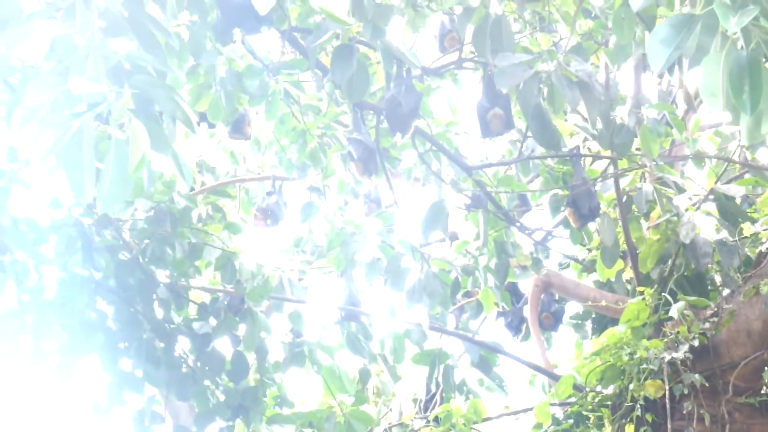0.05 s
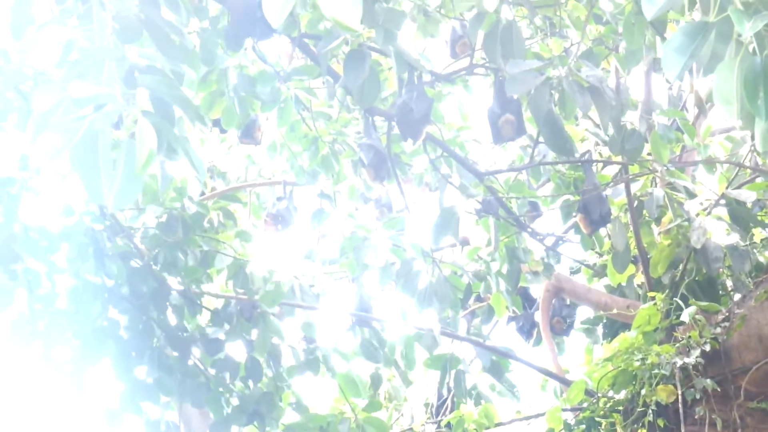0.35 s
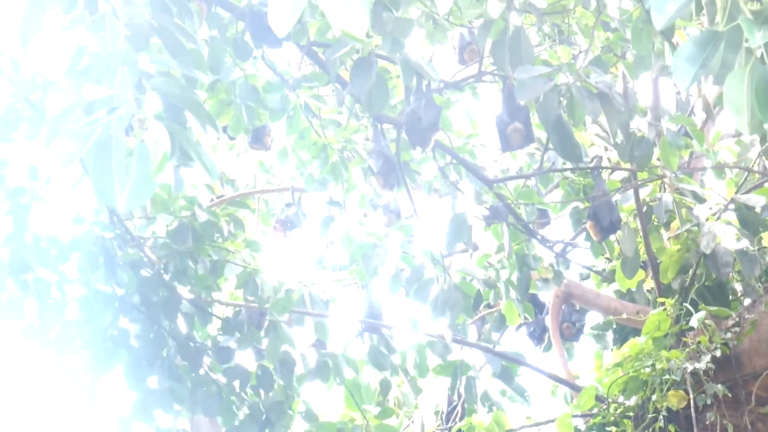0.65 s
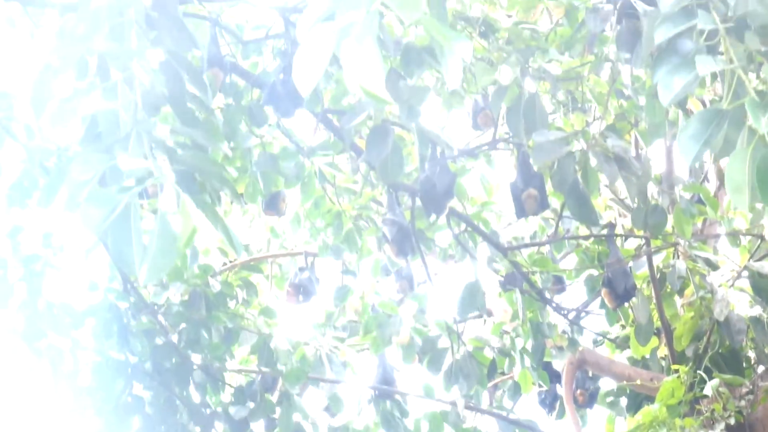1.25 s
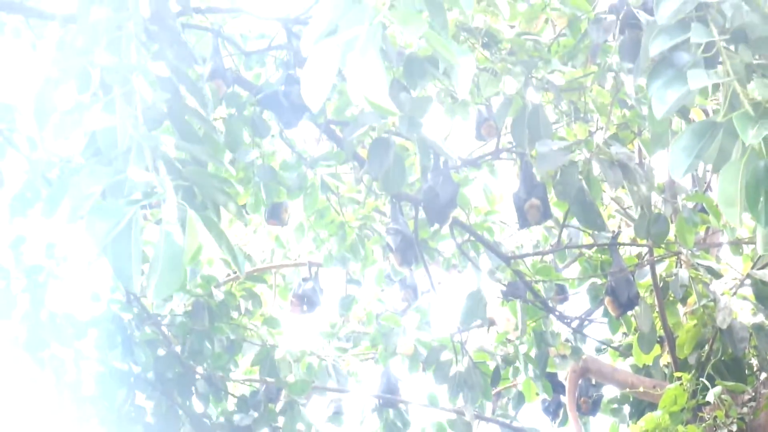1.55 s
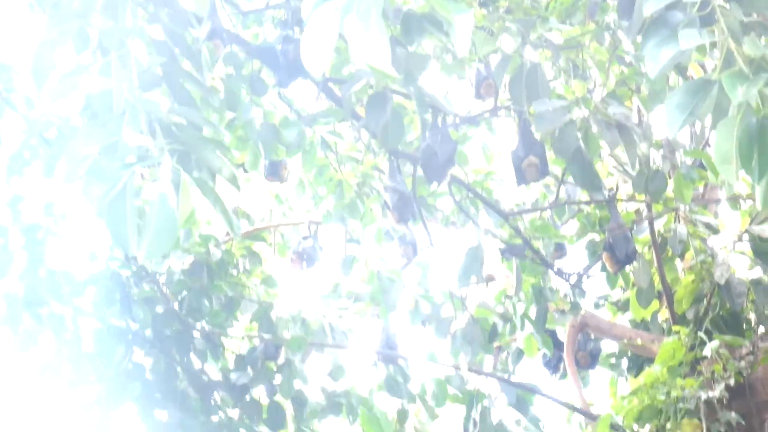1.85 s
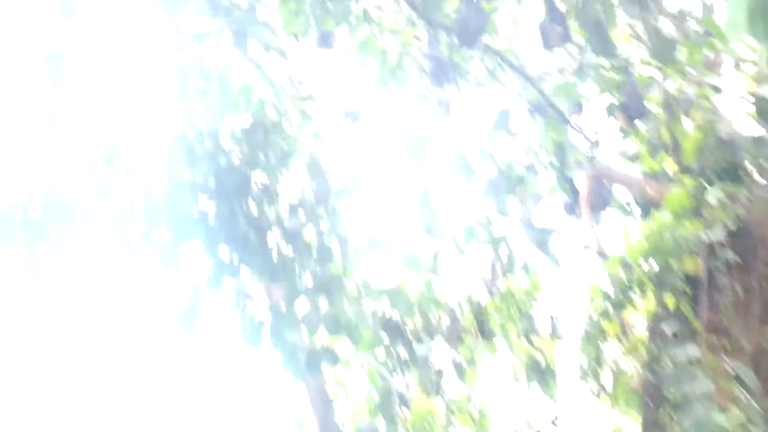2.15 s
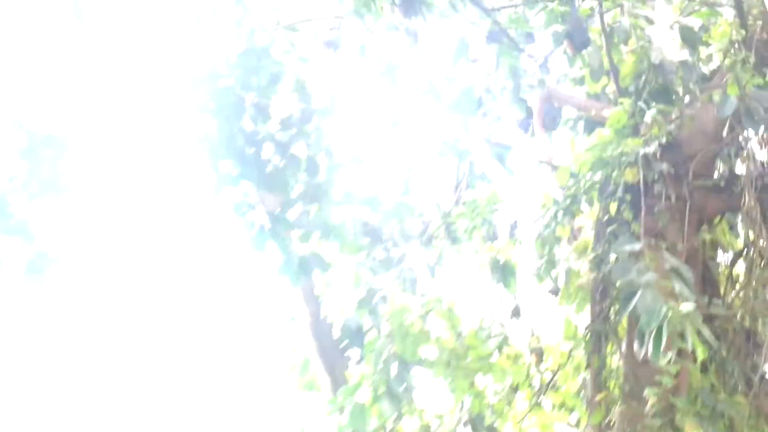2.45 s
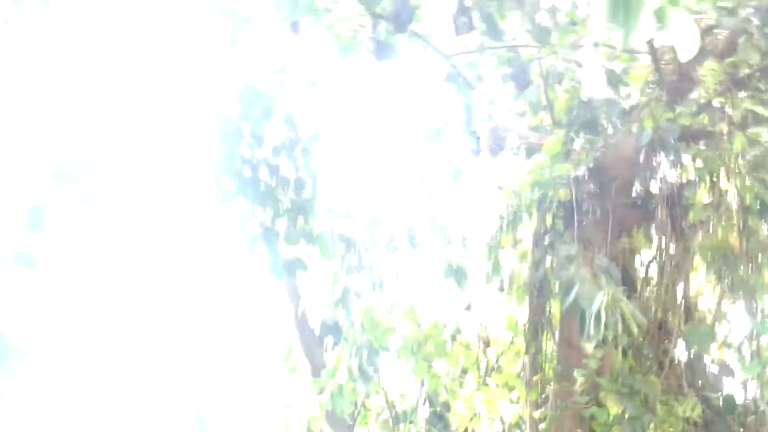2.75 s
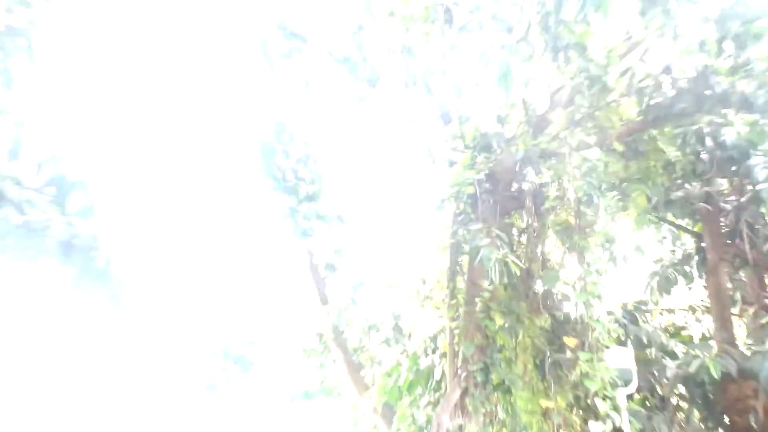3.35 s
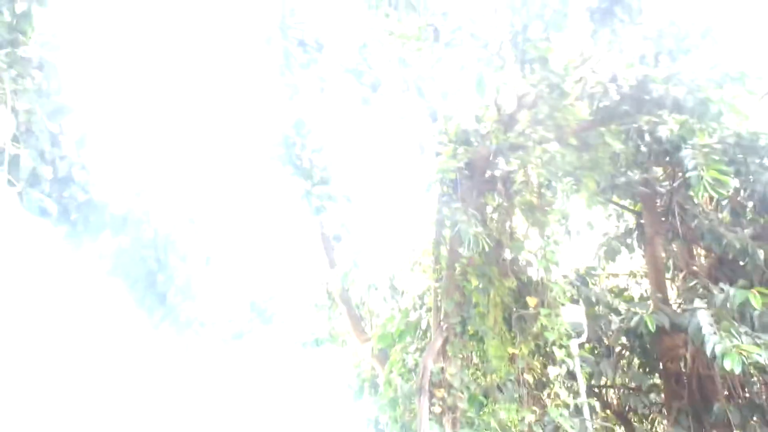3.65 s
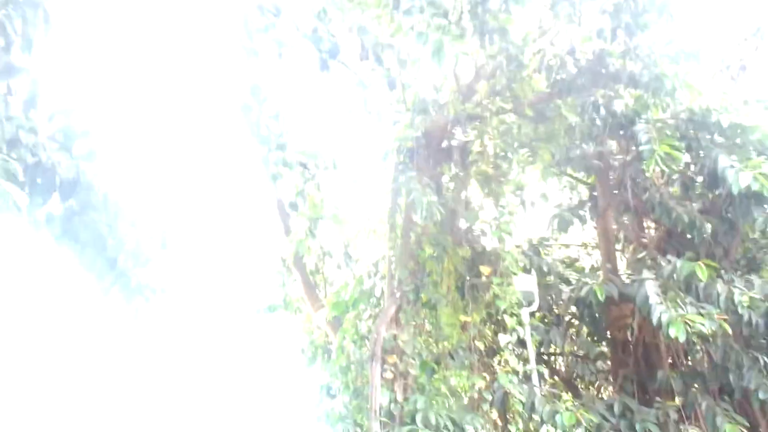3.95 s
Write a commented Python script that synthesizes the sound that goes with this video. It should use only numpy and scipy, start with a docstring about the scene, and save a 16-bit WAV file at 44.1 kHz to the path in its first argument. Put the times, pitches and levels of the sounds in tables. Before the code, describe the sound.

A colony of fruit bats screeches and squeaks without pause in tall trees. A whistling call opens, then nearer squeals, raspy screeches and thin high chirps stand out from the crowd. Traffic rumbles faintly far away.

```python
"""Tall trees with a squabbling colony of fruit bats, traffic far off.
A dense crowd of screeches and squeaks; nearer screeches, squeals, one long whistle, thin high chirps
and distant hoots stand out. Screeches are pulse trains shaped by the throat, the other calls jittering
tones, all scattered by the foliage. The traffic is shaped noise, motor hums and one engine that rises
and falls."""
import sys
import numpy as np
from scipy import signal
from scipy.fft import rfft, irfft, next_fast_len
from scipy.io import wavfile

SR = 44100
rng = np.random.default_rng(int(sys.argv[2]) if len(sys.argv) > 2 else 0)


def inscribe(sig):
    """Save sig as 16-bit PCM at rate SR to the path in sys.argv[1].

    A 1-D sig is mono; a 2-D sig holds one channel per row.
    Samples are clipped to [-1, 1] before scaling.
    """
    pcm = np.round(np.clip(np.atleast_2d(sig).T, -1, 1) * 32767)
    wavfile.write(sys.argv[1], SR, pcm.astype(np.int16))


N = 176400

# crowd spectrum: freq_hz, gain_db
CROWD_SPECTRUM = [(760, -45), (1300, -10.5), (1570, -19), (2370, -0.5), (2860, -3), (3860, -9), (4610, -9),
                  (7980, -22), (10900, -31.5), (14600, -39), (15500, -48)]
# crowd band envelopes, before BAND_TRIM_DB: time_s, level_db
LOW_BAND_ENV = [(0.02, -26.5), (0.43, -26.5), (0.68, -26.5), (0.73, -27.5), (0.78, -26.5), (2.84, -29),
                (3.12, -31.5), (3.18, -27), (3.25, -29.5), (3.44, -27.5), (3.75, -30.5), (3.79, -26.5),
                (3.96, -27.5)]
MID_BAND_ENV = [(0.02, -25.5), (0.16, -25), (0.46, -25), (0.59, -30.5), (0.93, -26), (1.38, -25.5),
                (1.47, -31), (1.76, -25), (2.14, -29), (2.22, -22), (2.71, -29.5), (2.76, -23.5),
                (3.49, -23.5), (3.62, -32), (3.7, -29.5), (3.73, -23), (3.78, -25), (3.96, -26)]
HIGH_BAND_ENV = [(0.0, -29.5), (0.23, -32.5), (1.14, -29.5), (1.19, -32), (2.08, -32.5), (2.22, -29.5),
                 (2.54, -33.5), (2.58, -31.5), (2.75, -33.5), (2.86, -29.5), (3.0, -30), (3.03, -29),
                 (3.33, -32.5), (3.44, -29.5), (3.93, -33), (4.0, -32.5)]
TOP_BAND_ENV = [(0.0, -46), (0.11, -49), (0.58, -50.5), (1.38, -45), (1.51, -50), (1.8, -49), (2.07, -49),
                (2.28, -47.5), (2.74, -51.5), (2.84, -45), (2.99, -48), (3.27, -47), (3.52, -48.5),
                (3.54, -49), (3.7, -52), (4.0, -48.5)]
BAND_EDGES_HZ, BAND_TRIM_DB = [1300, 3080, 5100, 9000, 17000], [-1, -3.5, -0.5, 6.5]

# near screeches: start_s, length_s, start_hz, end_hz, relative_db
SCREECH_CALLS = [(0, 0.28, 572, 559.4, -27), (0.157, 0.31, 778, 800, -42), (0.281, 0.15, 577.6, 590, -30),
                 (0.748, 0.17, 579, 553, -25.5), (0.936, 0.28, 581, 558, -31), (.95, 0.21, 478, 454, -37.5),
                 (1.158, 0.31, 594, 559.5, -30), (1.692, 0.31, 579, 614, -33.5),
                 (1.704, 0.23, 505, 515, -34), (1.944, 0.27, 588, 572, -27.5), (2.166, 0.12, 654, 624, -35),
                 (2.284, 0.48, 510, 520, -47), (2.516, .21, 504.5, 496, -30.5),
                 (2.742, 0.29, 558, 554.5, -31), (3.018, 0.23, 645, 600, -32),
                 (3.261, 0.17, 574, 565.6, -30), (3.424, 0.13, 564, 561, -37),
                 (3.702, 0.065, 605, 596, -33), (3.8, 0.26, 625, 573, -30)]
# throat resonances: freq_hz, gain_db
THROAT_RESPONSE = [(1000, -22), (1700, -10), (2300, -0.5), (3000, 4.5), (3600, -6.5), (4600, -8),
                   (6000, -13.5), (9000, -62), (15000, -54)]
# squeals: start_s, length_s, start_hz, mid_hz, end_hz, level_db, jitter_ratio
SQUEAL_CALLS = [(.11, 0.13, 3250, 3320, 3430, -35, .02), (.37, 0.072, 3900, 3870, 4000, -34, .015),
                (.43, 0.1, 2400, 2503, 2477, -29, 0.053), (.52, .125, 1763, 2030, 1910, -35.5, .015),
                (.635, 0.029, 1980, 1795, 1610, -30, .015), (0.691, 0.083, 2450, 2600, 2590, -25, 0.021),
                (.711, 0.023, 2530, 2620, 2600, -16, 0.012), (.82, 0.12, 4600, 4650, 4270, -35, 0.042),
                (.89, 0.094, 2830, 2890, 2880, -30.5, 0.033), (1.05, 0.19, 4550, 4620, 4500, -35, 0.016),
                (.97, 0.062, 4650, 4720, 4530, -31.5, .008), (1.075, 0.044, 2420, 2360, 2350, -25.5, 0.014),
                (1.115, 0.035, 5400, 5500, 5500, -41, .01), (1.145, .025, 1700, 1380, 1160, -38, .02),
                (1.54, 0.058, 1700, 1710, 1580, -36.5, .05), (1.57, 0.036, 2650, 2614, 2460, -25, 0.022),
                (1.78, 0.024, 1150, 1340, 1460, -36, .02), (1.85, 0.052, 2400, 2464, 2450, -24.5, 0.012),
                (2.01, .15, 2330, 2300, 2320, -34, 0.016), (2.105, 0.058, 2900, 2825, 2940, -29.5, .012),
                (2.16, 0.2, 4620, 4800, 4640, -33.5, 0.016), (2.33, 0.17, 4640, 4620, 4250, -33, .02),
                (2.395, 0.032, 1390, 1305, 1220, -39, .02), (2.435, 0.1, 2270, 2270, 2400, -27, 0.015),
                (2.74, 0.072, 3550, 3780, 3850, -32, 0.018), (2.55, 0.074, 6050, 6170, 6300, -35, .007),
                (2.56, .13, 3086, 3073, 2795, -31, 0.0095), (2.57, 0.12, 2230, 2210, 2200, -31.5, .025),
                (2.84, 0.036, 5400, 5360, 5250, -34, .008), (2.88, 0.064, 2080, 2105, 2180, -27.5, 0.018),
                (3.015, .045, 5450, 5480, 5530, -31.5, 0.009), (3.075, 0.022, 1300, 1370, 1330, -38, .02),
                (3.125, 0.086, 2250, 2447, 2440, -25.5, 0.013),
                (3.174, 0.021, 2450, 2490, 2560, -23, 0.014), (3.33, .06, 4850, 4880, 4870, -36, .01),
                (3.405, 0.14, 2820, 2750, 2753, -28.5, 0.031), (3.54, .1, 2080, 1983, 1985, -34.5, 0.032),
                (3.72, .06, 4250, 4520, 4650, -30, 0.014), (3.77, 0.098, 2600, 2625, 2540, -33, 0.018),
                (3.82, 0.17, 3730, 3570, 3513, -31.5, 0.011), (3.87, 0.13, 4170, 4130, 4060, -34, 0.022),
                (3.94, 0.093, 1850, 1740, 1750, -37, .02)]
# squeal and squeak harmonics 1 and 2: gain_db
HARMONICS_DB = [0, -24]
# long whistle: time_s, pitch_hz, relative_db
WHISTLE_CONTOUR = [(0.0, 2245, -28), (0.026, 2273, -18), (0.05, 2323, -30), (0.068, 2276, -17.5),
                   (0.134, 2280, -19.5), (0.156, 2320, -25), (0.204, 2315, -16.5), (0.354, 2315, -20),
                   (0.42, 2314, -31)]
# high chirps: start_s, length_s, start_hz, end_hz, level_db, jitter_ratio
CHIRP_CALLS = [(1.235, 0.082, 9680, 9100, -37, .05), (1.31, 0.078, 9800, 8700, -34.5, .05),
               (1.378, 0.031, 9400, 8700, -31.5, .05), (1.428, 0.043, 9260, 9000, -34, .05),
               (1.5, 0.038, 9000, 9400, -36, .05), (1.568, .032, 9200, 9150, -34.5, .05),
               (2.147, .19, 10780, 11400, -40, .045), (2.845, 0.15, 10600, 10700, -41, .035),
               (3.15, .14, 11000, 10520, -39, .03), (3.51, 0.2, 11000, 10520, -39, .04),
               (3.533, 0.11, 12600, 12300, -48, .045)]
# distant low calls: start_s, length_s, pitch_hz, level_db
HOOT_CALLS = [(0, .06, 980, -36.5), (0.392, 0.11, 990, -35), (0.567, .23, 1013, -38),
              (1.051, 0.34, 920, -41), (1.417, 0.18, 885, -38.5), (1.646, 0.15, 945, -38),
              (2.294, 0.15, 985, -34.5), (2.516, .22, 990, -36.5), (2.852, 0.33, 960, -41.5),
              (3.542, 0.23, 975, -36)]

# road rumble and low drone spectra: freq_hz, gain_db
ROAD_SPECTRUM = [(13, -42), (22, -12.5), (76, 1), (107, -3), (134, -3.5), (194, -7), (397, -9.5), (460, -6),
                 (730, -9), (962, -6), (1180, -11), (1440, -15.5), (1800, -11), (2340, -4), (3960, -120)]
DRONE_SPECTRUM = [(120, -15), (210, 2.5), (250, -3), (300, 7.5), (380, 1), (600, -22)]
# road, drone and engine envelopes: time_s, level_db
ROAD_ENV = [(0, -35.5), (.3, -35.5), (.7, -34), (1.6, -33.5), (2.6, -32.5), (3.3, -33.5), (4, -34)]
DRONE_ENV = [(0, -71), (1.2, -46.5), (2, -51), (2.9, -43), (4, -47.5)]
ENGINE_ENV = [(.2, -70), (.39, -38.5), (.7, -51), (1, -36.5), (1.5, -45.5), (1.65, -36), (1.8, -56),
              (2.11, -40.5), (2.55, -38.5), (2.8, -52)]
# engine fundamental: time_s, pitch_hz
ENGINE_CONTOUR = [(.2, 122.7), (.4, 131.8), (.7, 150.7), (1, 141.7), (1.42, 123.6), (1.72, 143),
                  (1.95, 118), (2.11, 125), (2.51, 152), (2.7, 160)]
# far motors: pitch_hz, level_db
MOTOR_HUMS = [(72, -61.5), (90, -51.5), (459, -53), (590, -53.5), (632, -51.5)]

# left-right likeness of diffuse sound: freq_hz, correlation (clipped to 0..1 in use)
STEREO_CORRELATION = [(60, 0.99), (130, 1), (290, 0.99), (640, 0.98), (1410, 0.91), (3100, 0.71),
                      (6820, 0.071), (15000, -2.7)]
# microphone balance: freq_hz, left_minus_right_db
MIC_BALANCE = [(60, -2.5), (130, -3), (290, -2.5), (640, -3.0), (1410, -2), (3100, 1), (6820, 3),
               (15000, 7.5)]

ATTACK_S, RELEASE_S, FLUTTER_DB = 0.008, 0.011, 2
TREES_T60_S = 0.29


def crowd(squeak_db=-9.5, wash_db=-1):
    """Screeches, squeaks and the noise wash of the farthest bats; four bands swell and ebb."""
    voices = far_screeches() + amp(squeak_db) * far_squeaks() + amp(wash_db) * diffuse_noise()
    envelopes = [LOW_BAND_ENV, MID_BAND_ENV, HIGH_BAND_ENV, TOP_BAND_ENV]
    lowpass = lambda hz, corner_hz: 1 / (1 + (hz / corner_hz) ** 30)
    out = np.zeros((2, N))
    for lo_hz, hi_hz, trim_db, env in zip(BAND_EDGES_HZ, BAND_EDGES_HZ[1:], BAND_TRIM_DB, envelopes):
        bandpass = lambda hz: lowpass(hz, hi_hz) - lowpass(hz, lo_hz)
        band = filtered(voices, lambda hz: amp(log_interp(CROWD_SPECTRUM, hz)) * bandpass(hz))
        out += unit_rms(band) * amp(trim_db + curves(env)[0])
    return out


def far_screeches(count=60, pitch_hz=601.2):
    """Overlapping pulse trains of many bats, each at its own pitch."""
    out = np.zeros(N)
    for k, (shift, stretch, pitch, bend, slope, gain) in enumerate(rng.standard_normal((count, 6))):
        start_s = (k + shift / 2) / count * N / SR - 0.1
        arc_hz = pitch_hz * np.exp(0.16 * pitch + np.array([0, 0.02 * bend, 0.03514 * slope]))
        phase, env = call(0.2 * np.exp(0.39 * stretch), arc_hz, jitter=0.01986)
        add(out, start_s, amp(1.6 * gain) * env * pulse_train(phase))
    return unit_rms(foliage(out, wet=0.88))


def far_squeaks(count=200, pitch_hz=2656):
    """Quick swooping tones all over the canopy."""
    out = np.zeros(N)
    for k, (shift, stretch, pitch, bend, slope, gain) in enumerate(rng.standard_normal((count, 6))):
        start_s = (k + shift) / count * N / SR
        arc_hz = pitch_hz * np.exp(0.13 * pitch + np.array([0, 0.09 * bend, 0.12 * slope]))
        phase, env = call(0.02656 * np.exp(0.344 * stretch), arc_hz, jitter=0.029)
        add(out, start_s, amp(2 * gain) * env * squeal_tone(phase))
    return unit_rms(foliage(out, wet=0.64))


def near_screeches():
    """Vocal pulse trains through the throat's resonances."""
    pulses = np.zeros(N)
    for start_s, length_s, *arc_hz, relative_db in SCREECH_CALLS:
        phase, env = call(length_s, arc_hz, jitter=0.012)
        add(pulses, start_s, amp(relative_db + 5.5) * env * pulse_train(phase))
    return foliage(shaped(pulses, THROAT_RESPONSE), wet=0.23)


def squeals():
    """Short arching tones, clean to hoarse with rising jitter."""
    out = np.zeros(N)
    for start_s, length_s, *arc_hz, level_db, jitter in SQUEAL_CALLS:
        phase, env = call(length_s, arc_hz, jitter)
        add(out, start_s, amp(level_db) * env * squeal_tone(phase))
    return foliage(out, wet=0.38)


def whistle():
    """One long, nearly pure tone from a bat close by."""
    pitch_hz, relative_db = curves(WHISTLE_CONTOUR)
    end_s = WHISTLE_CONTOUR[-1][0]
    fade = np.clip((end_s - np.arange(N) / SR) / RELEASE_S, 0, 1)
    phase = phase_of(pitch_hz * (1 + 0.0015 * wobble(317)))
    env = amp(relative_db + 1.5 + 0.66 * wobble(86)) * fade
    return foliage(env * np.sin(phase), wet=0.025)


def chirps():
    """Thin high sines, raspy from fast jitter."""
    out = np.zeros(N)
    for start_s, length_s, *arc_hz, level_db, jitter in CHIRP_CALLS:
        phase, env = call(length_s, arc_hz, jitter, jitter_rate_hz=1200)
        add(out, start_s, amp(level_db) * env * np.sin(phase))
    return foliage(out, wet=0.21)


def hoots():
    """Wavering low calls from far back in the trees."""
    out = np.zeros(N)
    for start_s, length_s, pitch_hz, level_db in HOOT_CALLS:
        phase, env = call(length_s, [pitch_hz, pitch_hz], jitter=0.054, jitter_rate_hz=170)
        add(out, start_s, amp(level_db) * env * np.sin(phase))
    return foliage(out, wet=0.19)


def call(length_s, arc_hz, jitter, jitter_rate_hz=700):
    """Phase and envelope of one call: jittered pitch arc; fluttering attack, hold and release."""
    t = np.arange(int(length_s * SR)) / SR
    arc = np.polyfit(np.linspace(0, 1, len(arc_hz)), arc_hz, len(arc_hz) - 1)
    pitch_hz = np.polyval(arc, t / length_s) * (1 + jitter * wobble(jitter_rate_hz, len(t)))
    gate = np.clip(t / ATTACK_S, 0, 1) * np.clip((length_s - t) / RELEASE_S, 0, 1)
    return phase_of(pitch_hz), gate * amp(FLUTTER_DB * wobble(134.3, len(t)))


def pulse_train(phase, harmonics=24):
    """Sharp vocal pulses: equal harmonics, rms 1."""
    return (np.sin((harmonics + 0.5) * phase) / (2 * np.sin(phase / 2)) - 0.5) / np.sqrt(harmonics / 2)


def squeal_tone(phase):
    """Fundamental plus a weak octave."""
    return np.sqrt(2) * sum(amp(db) * np.sin(k * phase) for k, db in enumerate(HARMONICS_DB, 1))


def foliage(x, wet, blocks=14):
    """Direct sound plus scatter off trunks and leaves, new paths each block; wet is the power share."""
    t = np.arange(SR // 4) / SR
    scatter = np.zeros((2, N))
    for k, block in enumerate(np.array_split(x, blocks)):
        tails = rng.standard_normal((2, len(t))) * amp(-60 * t / TREES_T60_S)
        for track, tail in zip(scatter, tails):
            add(track, k * N / blocks / SR, signal.fftconvolve(block, tail / np.linalg.norm(tail)))
    return np.sqrt(1 - wet) * x + np.sqrt(wet) * spread(scatter)


def traffic():
    """Far road rumble, wavering motor hums, one engine and a swelling drone."""
    road = rumble(ROAD_SPECTRUM, ROAD_ENV)
    hums = sum(amp(db + 2.5 * wobble(4.03)) * sine(hz + 3 * wobble(14)) for hz, db in MOTOR_HUMS)
    return road + hums + engine() + rumble(DRONE_SPECTRUM, DRONE_ENV)


def engine():
    """One far engine changing speed: fundamental and octave."""
    pitch_hz = curves(ENGINE_CONTOUR)[0] * (1 + 0.012 * wobble(30.8))
    env = amp(curves(ENGINE_ENV)[0] + 1.5 * wobble(15))
    return env * (sine(pitch_hz) + amp(-13) * sine(2 * pitch_hz))


def rumble(spectrum, envelope):
    """Diffuse traffic noise with a slowly moving level."""
    return amp(curves(envelope)[0]) * unit_rms(shaped(diffuse_noise(), spectrum))


def diffuse_noise():
    return spread(rng.standard_normal((2, N)))


def spread(pair):
    """Two unrelated signals to left and right: alike in the bass, apart in the treble."""
    angle = lambda hz: np.arccos(np.clip(log_interp(STEREO_CORRELATION, hz), 0, 1)) / 2
    mid, side = filtered(pair, lambda hz: np.array([np.cos(angle(hz)), np.sin(angle(hz))]))
    return np.array([mid + side, mid - side])


def wobble(rate_hz, size=N):
    """Smooth random curve, rate_hz knots a second."""
    knots = rng.standard_normal(2048)
    whole, part = np.divmod(np.arange(size) * rate_hz / SR, 1)
    i, angle = whole.astype(int) % (len(knots) - 1), np.pi / 2 * part
    return knots[i] * np.cos(angle) + knots[i + 1] * np.sin(angle)


def amp(db):
    return 10 ** (np.asarray(db) / 20)


def unit_rms(x):
    return x / np.sqrt(np.mean(x ** 2) + 1e-20)


def phase_of(hz):
    return 2 * np.pi * np.cumsum(hz) / SR


def sine(hz):
    return np.sqrt(2) * np.sin(phase_of(hz))


def log_interp(points, hz):
    freq_hz, values = np.transpose(points)
    return np.interp(np.log(hz + 1), np.log(freq_hz + 1), values)


def curves(rows):
    """Per-sample curve for each column after time_s."""
    time_s, *columns = np.transpose(rows)
    return [np.interp(np.arange(N) / SR, time_s, column) for column in columns]


def filtered(x, response):
    size = next_fast_len(N + SR // 2)
    return irfft(rfft(x, size) * response(np.fft.rfftfreq(size, 1 / SR)), size)[..., :N]


def shaped(x, spectrum):
    return filtered(x, lambda hz: amp(log_interp(spectrum, hz)))


def add(track, start_s, x):
    i = int(start_s * SR)
    x = x[max(-i, 0):max(N - i, 0)]
    track[max(i, 0):][:len(x)] += x


def scene():
    return crowd() + near_screeches() + squeals() + whistle() + chirps() + hoots() + traffic()


def record(dry, left_lead_s=16e-6, cutoff_hz=15720):
    """Band-limited microphone pair: left brighter and slightly nearer, right fuller."""
    sides = np.array([[0.5], [-0.5]])
    balance = lambda hz: amp(sides * log_interp(MIC_BALANCE, hz))
    lead = lambda hz: np.exp(2j * np.pi * sides * hz * left_lead_s)
    return filtered(dry, lambda hz: balance(hz) * lead(hz) * (hz < cutoff_hz))


dry = scene()
out = record(dry)
inscribe(out)
```